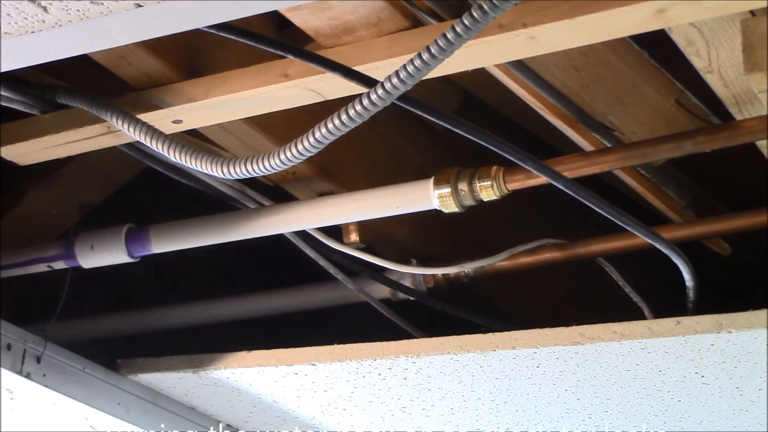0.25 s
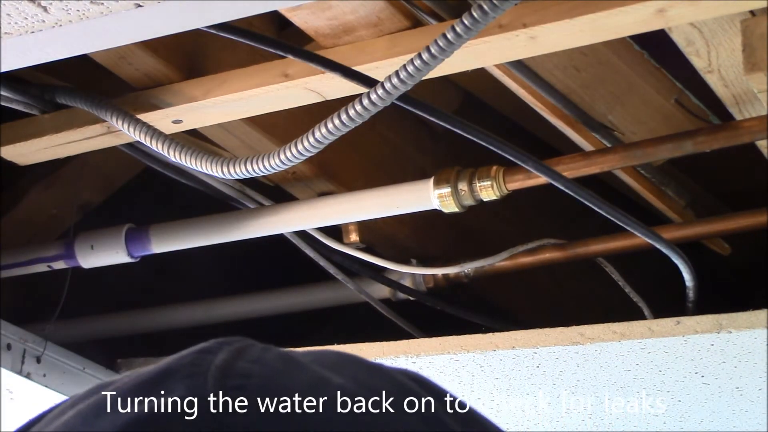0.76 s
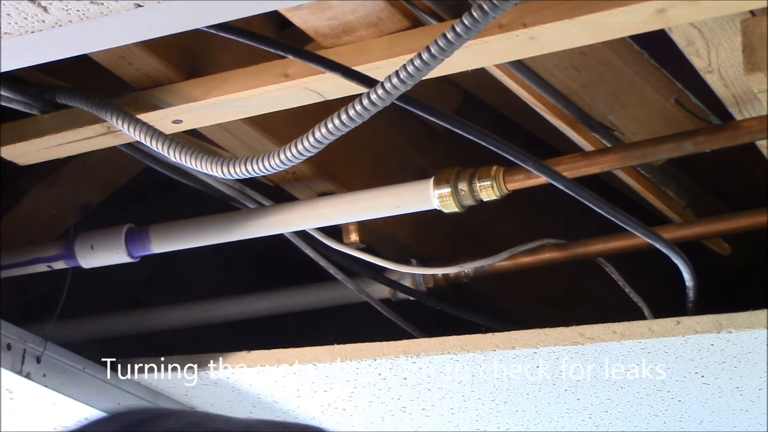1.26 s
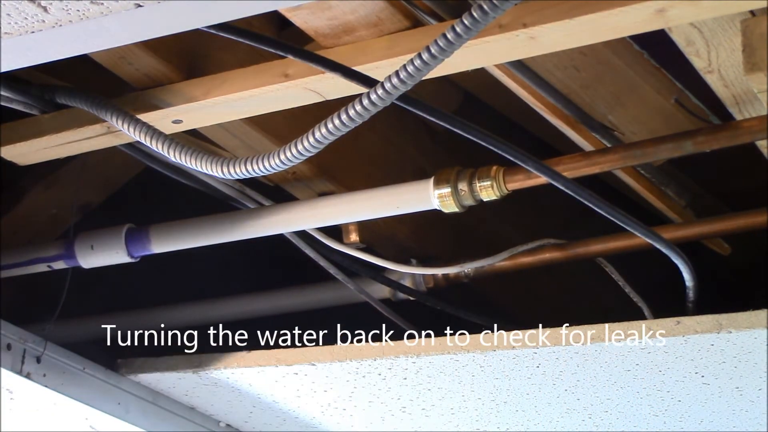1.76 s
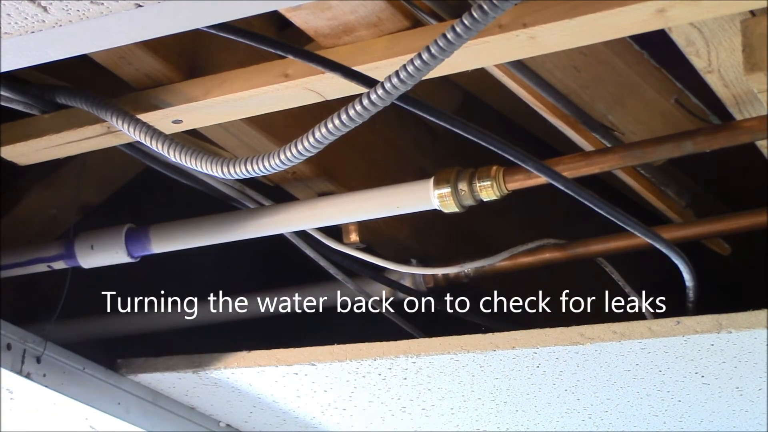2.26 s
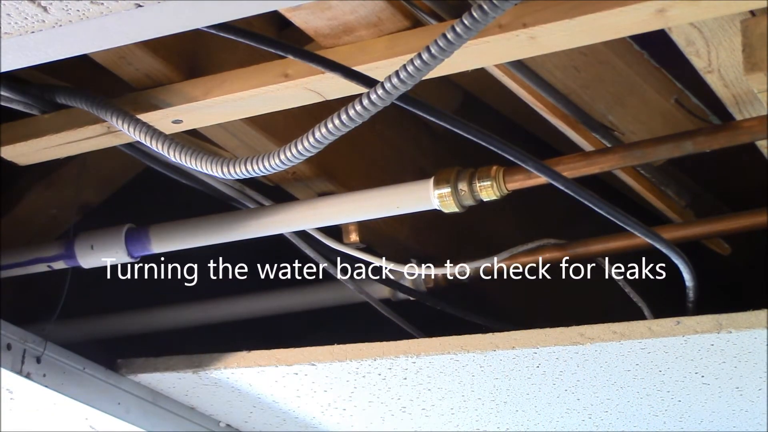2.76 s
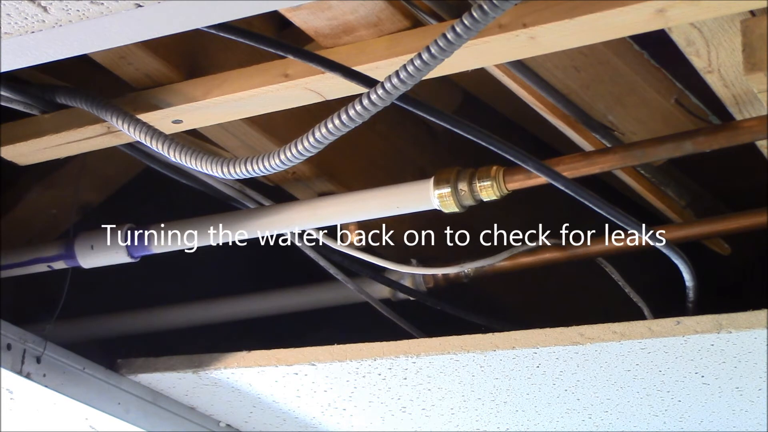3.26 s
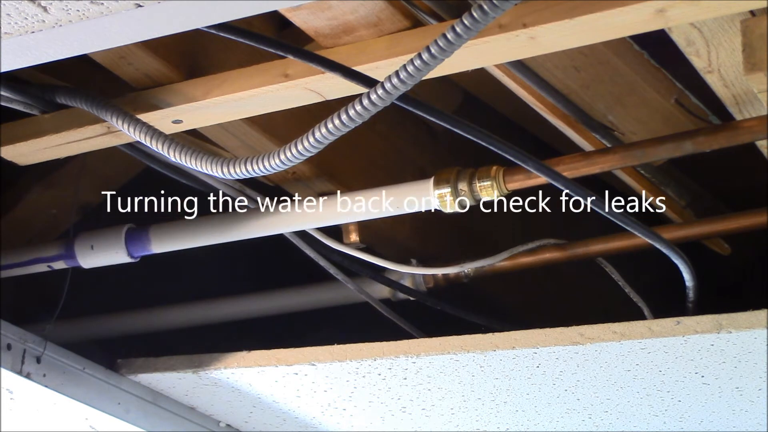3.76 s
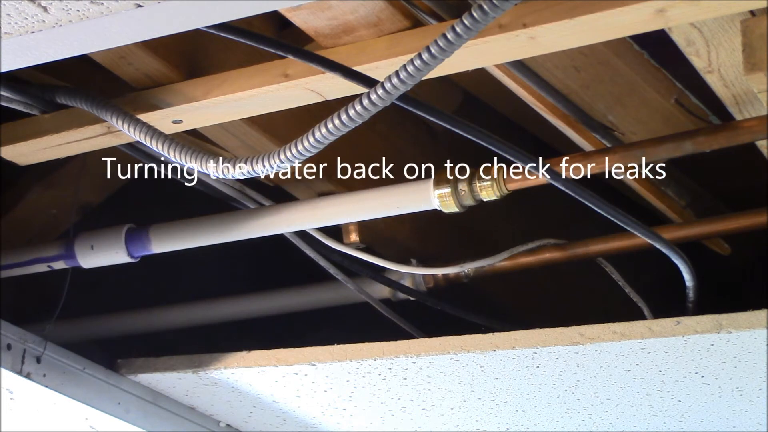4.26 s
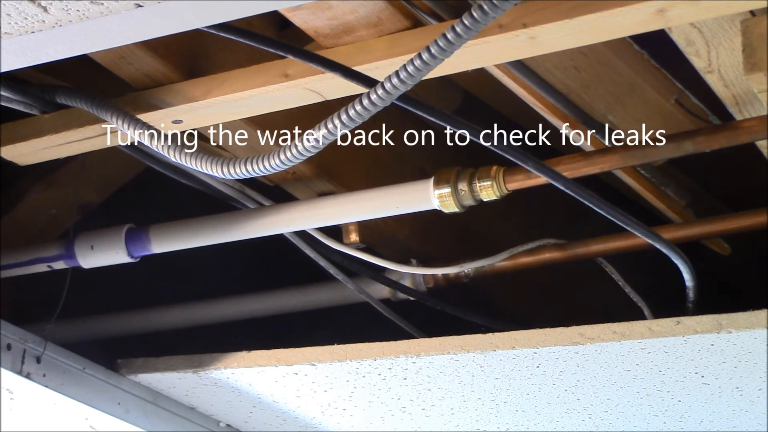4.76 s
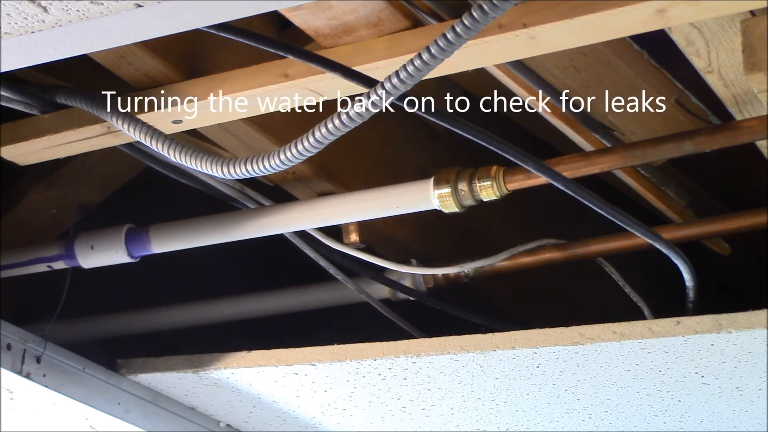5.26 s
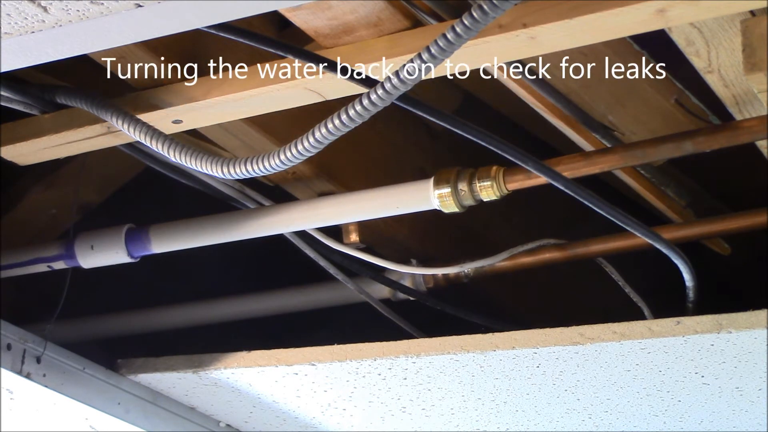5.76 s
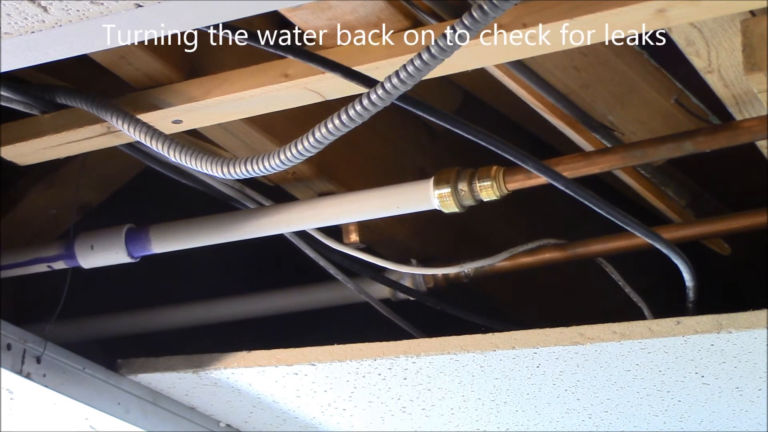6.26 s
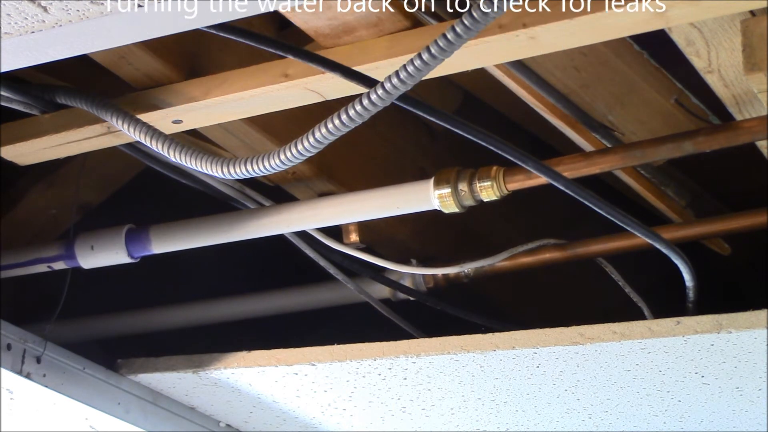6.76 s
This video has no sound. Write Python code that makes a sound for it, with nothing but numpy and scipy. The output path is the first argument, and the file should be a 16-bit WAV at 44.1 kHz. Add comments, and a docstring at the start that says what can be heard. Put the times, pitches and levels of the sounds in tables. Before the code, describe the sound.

In a basement ceiling, a thin whistle of seeping air and light snaps come first, then a cluster of dull wooden knocks near one second. Sharper metallic clicks crowd together until about three seconds and thin out. After a quiet lull with faint hiss and hum, bubbles chirp and crackle, and a jet of air and water sputters loudly just before the abrupt end. Close, nearly centred microphone, short dull room tail.

```python
"""Pipes under an open basement ceiling fill as the water is turned back on: noise bursts snap and spit,
then chopped noise pulses ring the pipe as air and water burst sputtering through it.
Before that the bubbles chirp and crackle as gliding tones and bright clicks, over filtered-noise water.
Air seeps thinly through the line as whistling noise, and a few dull knocks ring the wood.
A short diffuse room tail and a faint fan-like hum lie behind it all, in stereo."""
import sys
import numpy as np
from scipy import signal
from scipy.fft import rfft, irfft, next_fast_len
from scipy.io import wavfile
from scipy.ndimage import uniform_filter1d, map_coordinates

SR = 44100
rng = np.random.default_rng(int(sys.argv[2]) if len(sys.argv) > 2 else 0)


def output_pcm(signal):
    """Save a mono or channel-first signal as 16-bit PCM at the path in sys.argv[1].

    Samples are clipped to [-1, 1] before scaling.
    """
    pcm = np.clip(np.atleast_2d(signal).T, -1, 1) * 32767
    wavfile.write(sys.argv[1], SR, np.round(pcm).astype(np.int16))


N = 309141
TIME = np.arange(N) / SR


def from_db(db):
    """Decibels to gain."""
    return 10 ** (np.asarray(db) / 20)


def rms_one(x):
    """Scale to an rms of 1."""
    return x / np.sqrt(np.mean(x ** 2) + 1e-20)


def gains_in_time(rows):
    """One gain curve for each dB column, with straight dB lines between the rows."""
    s, *columns = np.transpose(rows)
    return [from_db(np.interp(TIME, s, column)) for column in columns]


def drift(per_s):
    """Random wander with a spread near 1: straight lines between per_s random points a second."""
    knots = rng.standard_normal(2000)
    return np.interp(TIME * per_s, np.arange(len(knots)), knots)


def colour(x, points):
    """Causal (minimum-phase) filter through (f/Hz, level/dB) points."""
    size = next_fast_len(2 * x.shape[-1], real=True)
    size += size % 2
    hz, db = np.transpose(points)
    grid = np.maximum(np.arange(size // 2 + 1) * SR / size, 1)
    response_db = np.interp(np.log(grid), np.log(hz), db)
    # folding the cepstrum onto positive times gives the minimum phase
    cepstrum = irfft(np.log(from_db(response_db)))
    cepstrum[1:size // 2] *= 2
    cepstrum[size // 2 + 1:] = 0
    return irfft(np.exp(rfft(cepstrum)) * rfft(x, size))[..., :x.shape[-1]]


def resonate(x, hz, width_hz):
    """One resonance, gain 1 on top."""
    r = np.exp(-np.pi * width_hz / SR)
    zeros = np.array([1, 0, -1]) * (1 - r * r) / 2
    poles = [1, -2 * r * np.cos(2 * np.pi * hz / SR), r * r]
    return signal.lfilter(zeros, poles, x)


def body(x, modes):
    """Parallel resonances, each passed twice so that the valleys stay dark."""
    out = 0
    for k, (hz, width_hz, db) in enumerate(modes):
        # two passes narrow the peak, so each is made wider; signs alternate from mode to mode
        ringing = resonate(resonate(x, hz, 1.5 * width_hz), hz, 1.5 * width_hz)
        out = out + (-1) ** k * from_db(db) * ringing
    return out


def tone(x, bass_db, slope_db):
    """A bass shelf and a treble slope (dB per octave) around the middle of the range."""
    return colour(x, [(900, bass_db), (1500, 0), (2200, 0), (13000, slope_db * np.log2(6))])


def burst(length, rise, t60, grain_db):
    """A tight cluster of micro-impacts; reflections between the joists die away after it."""
    t = TIME[:SR // 8]
    grains = rng.standard_normal(len(t)) * from_db(grain_db * rng.standard_normal(len(t)))
    return grains * np.minimum(t / rise, 1) * from_db(-60 * np.maximum(t - length, 0) / t60)


def add(out, s, sound, db):
    """Mix in a short sound; db is its energy spread over 20 ms."""
    start = max(round(s * SR), 0)
    gain = from_db(db) * np.sqrt(.02 * SR / np.sum(sound ** 2))
    out[start:start + len(sound)] += gain * sound[:max(N - start, 0)]


def release_of_air(s, length, attack, sag_db_per_s, t60):
    """Gain of one escape: it opens, sags as its pressure is spent, then dies away."""
    t = np.maximum(TIME - s, 0)
    die_away_db = np.minimum(60 * np.maximum(t - length, 0) / t60, 200)
    return np.minimum(t / attack, 1) * from_db(-sag_db_per_s * t - die_away_db)


def snaps():
    """Short dry snaps as pressure builds in the pipes; each favours one ring of the pipe wall."""
    # snaps and spits: t/s, nominal length/s, level/dB, bass/dB, treble slope/(dB per octave),
    # main ring f/Hz, rebound amplitude share/(0-1)
    snap_events = [(.182, 0.0065, -43, 2, 7, 1510, 0.27), (.272, 0.019, -48.5, 8, 13, 2600, 0.02),
                   (.348, 0.0093, -37.5, 7.5, 4, 2100, 0), (.4668, .0045, -41.5, 7, 14.5, 2920, 0),
                   (1.397, 0.0049, -41, 1, 4.5, 2220, 0.14), (1.6218, 0.0072, -39.5, 4, 1.9, 2135, 0.01),
                   (1.803, 0.0049, -36.5, 4.5, 5, 2320, 0.26), (2.068, 0.0057, -34, 5, 6, 2760, 0.22),
                   (2.2649, .0041, -36.5, -5, 7, 2420, 0.17), (2.416, .0034, -47.5, 8, 3, 1620, 0.03),
                   (2.433, 0.0075, -33, 5, 9.5, 2900, 0), (2.577, .014, -34.5, 1, 3, 3070, .3),
                   (2.634, 0.016, -44, 11.5, 8.5, 2070, 0), (2.7646, .01, -30, 2, 5, 3240, 0.02),
                   (2.774, 0.0088, -31, -10, 0.5, 2340, 0), (2.824, 0.0069, -39, 10.5, 0, 2130, 0),
                   (2.9046, 0.01, -30.5, -0.5, 2.5, 2550, 0.03), (3.1133, 0.012, -40, -1, 3.4, 2220, 0),
                   (3.192, 0.01, -52, 7, 1, 2120, 0), (3.267, .012, -44, 7, 2, 1350, 0),
                   (3.544, 0.0089, -48.5, 3, 4, 1830, 0), (3.634, 0.033, -41.5, 9, 8.5, 1500, 0.82),
                   (5.016, 0.02, -49.5, 6, 6.5, 2200, 0.02), (5.188, .01, -46, 11.5, -9, 1580, 0),
                   (6.202, .017, -48, -9, 11, 3460, 0.01), (6.264, 0.017, -44, 1, 11.5, 5660, 0),
                   (6.578, 0.008, -44, 16.5, 8, 1610, 0), (6.739, .0089, -42.5, 11, 3, 2480, 0.48)]
    # spectrum of a snap: f/Hz, level/dB (per Hz)
    snap_colour = [(150, -48.5), (300, -32.5), (480, -21), (780, -13), (950, -10.5), (1250, -4.5),
                   (1650, 0), (2350, -1), (2950, -4.5), (3300, -6.5), (4000, -10), (6500, -18.5),
                   (10000, -29.5), (16000, -42.5)]
    # rings of the pipe wall that every snap wakes: f/Hz, width/Hz, level/dB
    wall_modes = [(764, 46, 1.5), (1623, 35, 1), (1765, 30, -6), (2087, 33, -2), (2340, 30, -2),
                  (3070, 32, -2), (3336, 30, -2.5)]
    rebound_s = .023   # a pipe that springs back snaps again this much later
    out = np.zeros(N)
    for s, length, db, bass_db, slope_db, hz, rebound in snap_events:
        crack = burst(0.85 * length, rise=0.00016, t60=0.041, grain_db=2.0)
        crack[0] += 4.0      # the first slip is the sharpest
        main_ring = from_db(2.5) * resonate(crack, hz, width_hz=180)
        wall = sum(from_db(level) * resonate(crack, mode_hz, width) for mode_hz, width, level in wall_modes)
        crack = crack + main_ring + wall
        add(out, s, tone(colour(crack, snap_colour), bass_db, slope_db), db)
        if rebound > 0:
            again = burst(length, rise=.001, t60=.04, grain_db=2.0)
            again = tone(colour(again, snap_colour), bass_db, slope_db)
            add(out, s + rebound_s, again, db + 20 * np.log10(rebound))
    return out


def spurts():
    """Air pockets chop the jet into uneven pulses that ring the pipe, with fizz and a high whistle."""
    # air and water bursting through: t/s, length/s, then levels before the sag:
    # pipe tone level/dB, fizz level/dB, high whistle level/dB
    spurt_events = [(6.749, 0.042, -51.5, -59, -54.5), (6.832, .03, -53, -57, -50.5),
                    (6.866, 0.026, -33.5, -37.5, -44), (6.894, 0.0096, -46, -37.5, -45),
                    (6.904, 0.018, -34.5, -42, -49), (6.924, 0.026, -33.5, -38, -49),
                    (6.96, 0.023, -29, -41, -52), (6.996, .02, -37, -39.5, -53)]
    # resonances of the pipe, the fizz and the high whistle, each: f/Hz, width/Hz, level/dB
    pipe_modes = [(1650, 140, -18), (2020, 120, 0), (2250, 130, -4)]
    fizz_modes = [(2900, 600, -9), (4850, 250, -5), (5300, 170, 0), (7600, 1200, -17)]
    whistle_modes = [(7400, 480, -6), (10260, 890, 8), (13600, 1500, 6.5)]
    pipe, fizz, whistle = 0, 0, 0
    for s, length, pipe_db, fizz_db, whistle_db in spurt_events:
        release = release_of_air(s, length, attack=0.0035, sag_db_per_s=42, t60=0.022)
        pipe = pipe + from_db(pipe_db) * release
        fizz = fizz + from_db(fizz_db) * release
        whistle = whistle + from_db(whistle_db) * release
    sputter = from_db(4.0 * drift(220))
    # about 5000 random pulses a second for each of the three sounds
    collapses = rng.standard_normal((3, N)) * (rng.random((3, N)) < 5000 / SR) * sputter
    ringing = body(collapses[0], pipe_modes)
    # the steady pressure behind the jet holds its mean strength (over 350 samples)
    ringing = ringing / np.sqrt(np.abs(uniform_filter1d(ringing ** 2, size=350)) + 1e-12)
    fizzing = rms_one(body(collapses[1], fizz_modes))
    whistling = rms_one(body(collapses[2], whistle_modes))
    return pipe * ringing + fizz * fizzing + whistle * whistling


def slugs():
    """Slugs of water hit the bend: a single sharp front, then a cluster of small impacts."""
    # hits on the bend: t/s, length/s, level/dB, treble slope/(dB per octave)
    slug_events = [(6.831, 0.0081, -43.5, 15), (6.845, 0.0079, -37.5, -1), (6.862, 0.0066, -35, -1.5),
                   (6.873, .014, -30, -13), (6.956, 0.0034, -38, 5.5)]
    # spectrum of a hit: f/Hz, level/dB (per Hz)
    slug_colour = [(200, -43), (400, -23), (1000, -17), (1550, 5.5), (1800, 1), (2050, 6), (2350, 6.5),
                   (2700, -6), (4200, -12), (5250, -3), (6200, -12.5), (8500, -16), (11000, -46),
                   (16000, -42)]
    out = np.zeros(N)
    for s, length, db, slope_db in slug_events:
        blow = burst(length, rise=.0003, t60=.035, grain_db=3.0)
        blow[0] += 8.0      # the front of the slug lands all at once
        add(out, s, tone(colour(blow, slug_colour), 0, slope_db), db)
    return out


def flow():
    """Running water hisses and sprays; a close reflection gives the spray a hollow colour."""
    # water running in the pipe: t/s, hiss level/dB, fine spray level/dB
    flow_levels = [(0, -53, -61), (.4, -60, -66), (1.5, -60.5, -66), (2.3, -59, -62), (3.5, -61, -72.5),
                   (4.6, -68, -78), (5.55, -65.5, -80), (5.95, -54.5, -58.5), (6.3, -53.5, -58.5),
                   (6.45, -56, -70), (6.72, -53.5, -65), (7.01, -47, -53)]
    # spectra of the hiss and the spray, each: f/Hz, level/dB (per Hz)
    hiss_colour = [(200, -31.5), (450, -4), (1100, 1.5), (1700, 0), (2250, 1.5), (2800, -3), (3600, -5.5),
                   (6200, -7), (7500, -16.5), (16000, -27)]
    spray_colour = [(3000, -58), (6000, -23), (8000, -1), (11000, -2), (13800, -1), (16000, -1.5)]
    hiss, spray = gains_in_time(flow_levels)
    white = rng.standard_normal((3, N))
    water = hiss * rms_one(colour(white[0], hiss_colour)) * from_db(0.22 * drift(40))
    droplets = white[1] * from_db(5.5 * white[2])
    droplets = droplets + .45 * np.roll(droplets, SR // 650)   # reflection 1.5 ms later
    return water + spray * rms_one(colour(droplets, spray_colour)) * from_db(1.3 * drift(62))


def chirps():
    """Each bubble squeezed along the pipe rings with a rough, rising pitch and a little froth."""
    # small squeaks and deeper glugs: t/s, length/s, level/dB, starting f/Hz
    chirp_events = [(.75, .016, -61, 12950), (.812, .012, -64, 13000), (.814, 0.012, -58.5, 9600),
                    (.874, 0.011, -63, 12950), (1.745, .045, -57, 13500), (2.016, 0.026, -59, 365),
                    (2.191, .022, -62, 378), (3.658, 0.024, -45, 1100), (3.68, 0.026, -57.5, 398),
                    (5.698, .053, -57, 3690), (5.772, 0.027, -54, 3650), (5.866, 0.024, -49.5, 3680),
                    (5.933, .021, -56, 3540), (5.956, 0.017, -47, 3420), (5.974, .015, -54, 3650),
                    (6.006, 0.016, -48, 2840), (6.036, 0.018, -48, 2950), (6.048, 0.017, -52, 4480),
                    (6.116, 0.013, -53, 4000), (6.24, 0.014, -55, 4800)]
    chirp_rise = 1.49   # each bubble climbs by this many times its own pitch spread
    out, t = np.zeros(N), TIME[:SR // 12]
    for s, length, db, start_hz in chirp_events:
        spread_hz = min(.07 * start_hz, 260)
        pitch_hz = start_hz + chirp_rise * spread_hz * np.minimum(t / length, 1)
        phase = 2 * np.pi * np.cumsum(pitch_hz) / SR
        # slow noise on both phases of the tone roughens it
        lowpass = signal.butter(2, spread_hz, fs=SR, output="sos")
        rough = signal.sosfilt(lowpass, rng.standard_normal((2, len(t))))
        ringing = rms_one(rough[0] * np.sin(phase) + rough[1] * np.cos(phase))
        froth = rms_one(body(rng.standard_normal(len(t)), [(1.1 * start_hz, 7 * spread_hz, 0)]))
        swell = np.exp(-(2 * t / length - 1) ** 2)
        add(out, s, swell * (ringing + .7 * froth), db)
    return out


def cracks():
    """The smallest bubbles burst: one sharp pulse, then its brief bright reflections."""
    # bursting bubbles: t/s, level/dB
    crack_events = [(5.854, -60), (5.952, -47.5), (6.106, -48), (6.229, -56), (6.285, -52), (6.325, -42.5),
                    (6.338, -50)]
    # spectrum of a crack: f/Hz, level/dB (per Hz)
    crack_colour = [(1000, -32), (5500, -17), (7500, 0), (10500, 1.5), (13500, 9), (16000, -1)]
    out = np.zeros(N)
    for s, db in crack_events:
        crack = burst(.002, rise=.0003, t60=.028, grain_db=2.0)
        crack[0] += 7.0      # the collapse itself is a single sharp pulse
        add(out, s, colour(crack, crack_colour), db)
    return out


def seepage():
    """Puffs of air whistle thinly through the line; all the resonances shift together."""
    # puffs of air: t/s, length/s, level/dB (before the sag), pitch ratio at mid-puff
    puffs = [(-.03, 0.094, -42.5, 0.96), (.12, 0.13, -50, .98), (0.509, 0.09, -60, 0.95),
             (0.708, 0.076, -54, 0.94), (1.059, 0.14, -55, 1.01), (1.298, .16, -56.5, 0.96),
             (1.668, 0.152, -54.5, 1.04), (1.91, 0.095, -61, 1.01), (2.002, 0.071, -55, .9),
             (4.313, 0.072, -62, .85)]
    # whistling resonances of the seeping air: f/Hz, width/Hz, level/dB
    seep_modes = [(2050, 400, 0), (3100, 700, -8), (5150, 700, -10), (6500, 350, -1), (7350, 600, -10),
                  (9600, 700, -12), (13200, 1000, -12)]
    level = 0
    for s, length, db, _ in puffs:
        level = level + from_db(db) * release_of_air(s, length, attack=0.027, sag_db_per_s=20, t60=0.26)
    whistle = rms_one(body(rng.standard_normal(N), seep_modes))
    # reading the whistle faster or slower shifts its pitch, gliding from puff to puff
    starts, lengths, _, ratios = np.transpose(puffs)
    position = np.cumsum(np.interp(TIME, starts + lengths / 2, ratios))
    shifted = map_coordinates(whistle, [position], order=3, mode="wrap")
    return level * from_db(2.5 * drift(120)) * shifted


def knocks():
    """Soft blows set the wood ringing."""
    # dull knocks on wood: t/s, nominal length/s, level/dB, treble slope/(dB per octave)
    knock_events = [(0.522, 0.0092, -51, -2), (0.753, 0.0068, -47.5, 6), (0.82, 0.025, -46, -3),
                    (0.853, 0.0077, -42, -14), (0.87, 0.011, -52, 8), (0.952, 0.012, -49.5, -9),
                    (0.975, 0.0041, -41.5, 2.5), (1.056, 0.0046, -44.5, -16), (1.061, 0.0052, -36.5, -1),
                    (1.089, .01, -48.5, -8), (1.102, 0.0053, -44.5, -12), (1.131, 0.0095, -36, 3),
                    (1.188, 0.012, -44.5, -9), (1.238, 0.0021, -44.5, -16)]
    # modes of the wood: f/Hz, half the width/Hz, level/dB
    wood = [(442, 39, -18), (600, 41, -13), (654, 57, -3), (768, 30, 1.5), (995, 39, -2.5),
            (1260, 200, -10), (1550, 200, -14), (2210, 350, -17), (2860, 360, -10.5), (4200, 1400, -32)]
    dull = [(150, -20), (500, 4.5), (1100, 6), (2500, -4.5), (14000, -22)]   # f/Hz, level/dB
    out = np.zeros(N)
    for s, length, db, slope_db in knock_events:
        blow = burst(0.88 * length, rise=0.0035, t60=0.029, grain_db=3.0)
        ringing = sum(from_db(level) * resonate(blow, hz, 2 * half_width) for hz, half_width, level in wood)
        add(out, s, tone(colour(ringing, dull), 0, slope_db), db)
    return out


def basement(x):
    """A short diffuse tail, duller than the direct sound: decaying noise stands for the reflections."""
    t60_s = 0.11
    t = TIME[:SR // 2]
    tail = rng.standard_normal(len(t)) * np.minimum(t / .012, 1) * from_db(-60 * t / t60_s)
    wet = signal.fftconvolve(x, tail / np.sqrt(np.sum(tail ** 2)))[:N]
    return colour(wet, [(1000, -4.0), (4000, -11.0), (14000, -6.5)])


def background():
    """Steady broad noise, like a distant fan, with faint tones that waver in level and pitch."""
    # spectrum of the noise: f/Hz, level/dB (per Hz)
    air = [(15, -51), (25, -34), (229, -24.5), (317, -20.5), (463, -7), (503, -8.5), (840, -5), (988, -11),
           (1070, -3), (1400, -8.5), (1840, -9.5), (2000, -10), (6740, -21.5), (14800, -27.5), (16000, -39)]
    # tones of the hum: f/Hz, level/dB
    hum = [(235, -88.5), (425, -76.5), (468.3, -71), (581.4, -74.5), (847, -66.5), (939, -76.5),
           (1061, -71.5), (1122, -75), (1173, -75.5), (1408, -68.5), (1546, -70.5), (3521, -81),
           (7510, -82), (7978, -83), (14551, -80)]
    air_db = -57
    tones = 0
    for hz, db in hum:
        gain = from_db(db + 2.0 * drift(5)) * np.sqrt(2)   # the level is an rms
        phase = 2 * np.pi * np.cumsum(hz + 2.21 * drift(25.06)) / SR
        tones = tones + gain * np.sin(phase)
    return from_db(air_db) * rms_one(colour(rng.standard_normal(N), air)) + tones


def scene():
    """Everything sits in the middle; only reflections and background differ between the sides."""
    # stereo width of the background: f/Hz, side minus mid level/dB
    width = [(60, 3), (125, -3), (250, -5), (500, -16.5), (2000, -7.5), (4000, -3.5), (8000, -5),
             (16000, -7.5)]
    room_db = -2.5
    direct = snaps() + spurts() + slugs() + flow() + chirps() + cracks() + seepage() + knocks()
    mid = direct + from_db(room_db) * basement(direct) + background()
    reflections = from_db(-22) * basement(direct)
    side = reflections + colour(background(), width)
    return np.array([mid + side, mid - side])


def record(dry):
    """The top is cut steeply above 16.1 kHz by an elliptic low-pass."""
    cutoff_hz = 16100
    return signal.sosfilt(signal.ellip(12, .1, 70, cutoff_hz, fs=SR, output="sos"), dry)


dry = scene()
out = record(dry)
output_pcm(out)
```